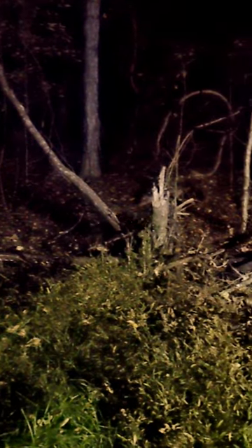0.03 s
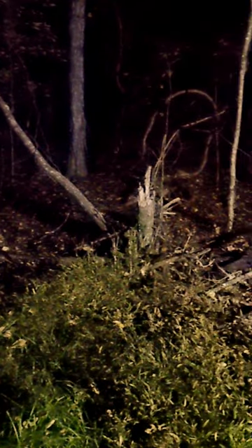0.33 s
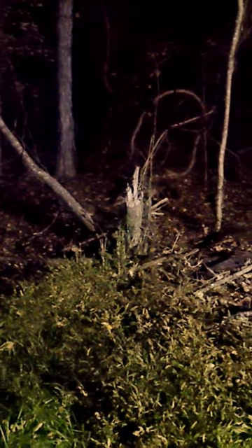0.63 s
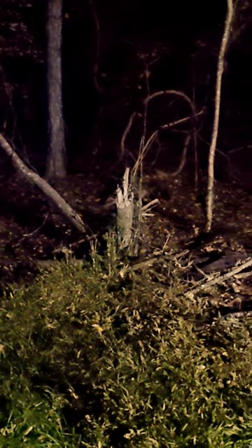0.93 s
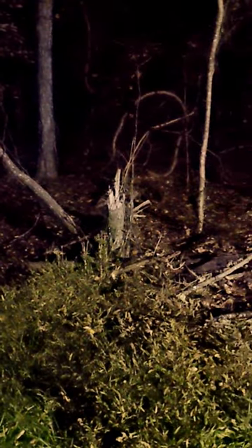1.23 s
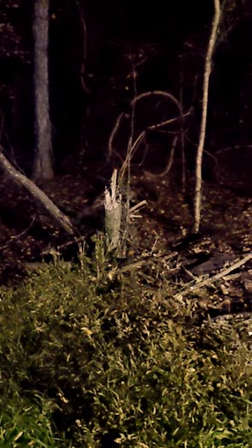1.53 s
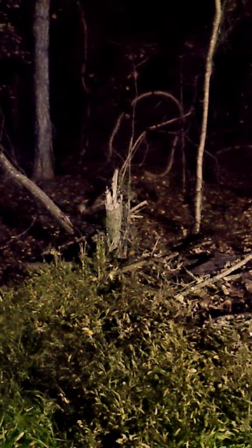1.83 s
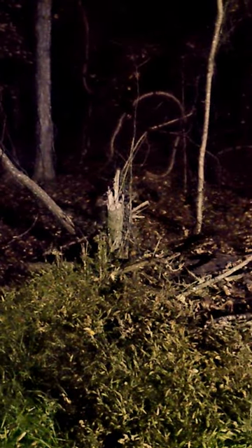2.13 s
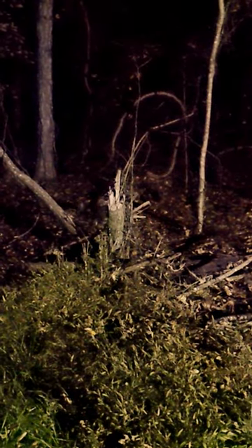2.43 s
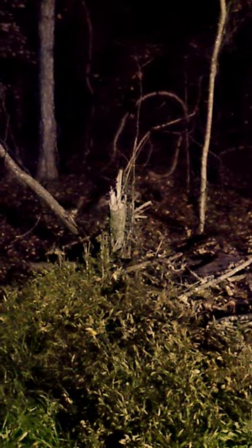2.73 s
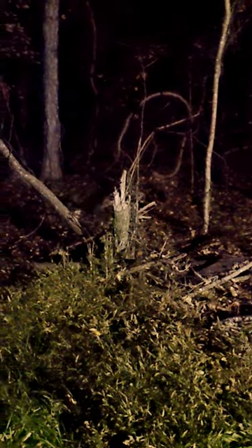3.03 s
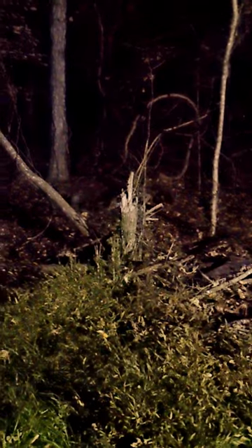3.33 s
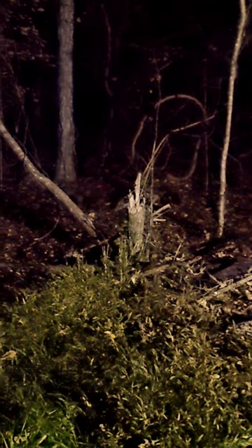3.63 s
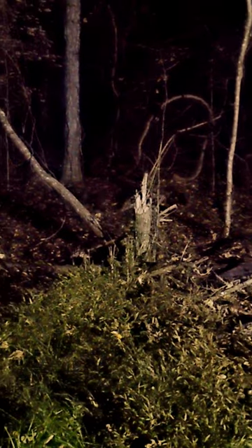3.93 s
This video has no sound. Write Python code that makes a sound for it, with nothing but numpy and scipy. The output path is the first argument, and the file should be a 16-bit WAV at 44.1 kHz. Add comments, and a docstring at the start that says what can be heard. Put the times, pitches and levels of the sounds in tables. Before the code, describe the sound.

A dense cricket chorus rings on in two pitches through dark woodland. Underneath, a far engine hums with a soft rumble of traffic, and now and then dry leaves crackle lightly near the microphone, to the left.

```python
"""Dozens of crickets trill at night at the edge of a wood, mainly in two pitch bands.
Each wing stroke rings a short falling note; the trees scatter the notes into a tail.
Dry leaves rustle faintly close by on the left, a dense crackle of tiny snaps.
A far engine drones and whines over a low rumble of traffic and night air."""
import sys
import numpy as np
from scipy import signal
from scipy.fft import rfft, irfft
from scipy.io import wavfile
from scipy.ndimage import map_coordinates

SR = 44100
rng = np.random.default_rng(int(sys.argv[2]) if len(sys.argv) > 2 else 0)


def put_to_file(sound):
    """Save the sound as 16-bit audio at rate SR, in the file named by the first command-line argument."""
    columns = np.atleast_2d(sound).T  # one column per channel
    safe = np.clip(columns, -1, 1)
    whole_steps = np.round(safe * 32767)
    wavfile.write(sys.argv[1], SR, whole_steps.astype(np.int16))


N = 176400
TIME_S = np.arange(N) / SR
FREQ_HZ = np.fft.rfftfreq(N, 1 / SR)

# near crickets: pitch_hz, spread_hz, strokes_per_s, level_db, pan_db (left minus right)
CHORUS_KINDS = [(2279, 42, 36, -52.5, 4), (2438, 60, 38, -58, -4), (4333, 55, 40, -60, 8.5),
                (4473, 32, 44, -63, -3.5)]
# far crickets: pitch_hz, spread_hz, strokes_per_s, level_db, pan_db
CROWD_KINDS = [(1965, 42, 45, -72.5, 1.5), (2361, 130, 48, -58, 1), (2583, 200, 71, -73, -2),
               (3132, 28, 45, -78.5, 1.5), (4350, 195, 58, -63, 0.5), (5067, 200, 60, -73, 1.5)]
# steady leaf stir: time_s, crisp_db
LEAF_STIR = [(0, -62), (.12, -68.5), (.3, -66), (.55, -69.5), (.8, -67.5), (1.05, -68), (1.45, -67),
             (1.65, -71), (1.77, -68), (1.85, -69), (2.1, -66), (2.26, -71.5), (2.34, -66.5), (2.55, -70.5),
             (3, -67.5), (3.2, -65), (3.6, -66.5), (3.85, -63), (4, -65)]
# leaf rustles: centre_s, length_s, crisp_db, crisp_over_papery_db
LEAF_RUSTLES = [(1.142, 0.027, -65, 5), (1.903, .035, -68, 8), (2.016, 0.031, -63, 6),
                (2.046, 0.027, -66, 3), (2.747, .06, -66.5, 5), (2.828, 0.039, -63, 3),
                (3.019, 0.014, -66, 1), (3.096, 0.076, -61, 3), (3.49, 0.12, -65, 2), (3.705, .018, -64, 2),
                (3.793, 0.049, -66, 7)]
# leaf snaps: start_s, crisp_db
LEAF_SNAPS = [(1.138, -61), (1.153, -47), (1.16, -55), (1.9, -54), (2.011, -56), (2.041, -55), (2.46, -63),
              (2.634, -59), (3.33, -53), (3.477, -52), (3.787, -60)]
# leaf treble: freq_hz, relative_db
CRISP_SPECTRUM = [(4000, -72), (7000, -13), (10500, -11), (11800, -3.5), (12300, -5), (13000, -1.5),
                  (14500, -4), (16000, -9.5)]
# leaf upper mids: freq_hz, relative_db
PAPERY_SPECTRUM = [(2000, -18), (5500, -10), (6600, -6.5), (7100, -1), (7600, -8), (8100, -6.5), (9000, -6),
                   (9550, -14.5), (10000, -7.5), (11000, -36), (14000, -11)]
# engine drone: time_s, level_db, pitch_hz
ENGINE_DRONE = [(0.0, -55.5, 83.4), (0.2, -48, 77.2), (0.28, -58, 85.5), (0.32, -47, 80.8),
                (0.41, -65, 71.2), (0.51, -50.5, 80.15), (0.68, -46, 80), (0.77, -60, 82.8),
                (0.82, -46.5, 82.6), (0.99, -49, 82.6), (1.05, -58, 81.6), (1.56, -51, 82.81),
                (1.58, -54, 82.4), (2.36, -54, 83.5), (2.38, -47, 85.2), (2.53, -60.5, 85),
                (2.56, -48.5, 83.77), (2.82, -56, 84.7), (2.94, -46, 85.2), (3.01, -62, 85.16),
                (3.2, -52.5, 86.2), (3.23, -64, 85.3), (3.33, -49, 86.03), (3.42, -58.5, 85.9),
                (3.94, -49.5, 85.47), (4.0, -48, 88.1)]
# upper engine whine: time_s, level_db, pitch_hz
UPPER_WHINE = [(0, -80, 503), (.18, -71, 503.7), (.42, -68.5, 504.4), (.6, -77, 507.4),
               (1.05, -78.5, 505.4), (1.52, -67, 510.8), (1.75, -74.5, 512.3), (3.1, -73, 514),
               (3.35, -85, 514.6), (3.52, -67.5, 516.2), (4, -65.5, 514.7)]
# lower engine whine: time_s, level_db, pitch_hz
LOWER_WHINE = [(0, -94, 335), (1.7, -79.5, 339), (2.05, -70, 340), (2.7, -74, 342), (3.1, -72.5, 343),
               (3.7, -74, 342.2), (4, -76, 345)]
# far rumble: freq_hz, relative_db
RUMBLE_SPECTRUM = [(20, -25), (32, -22), (55, -3), (75, 2.5), (110, -2), (170, -3), (240, -9), (290, -15),
                   (420, -16.5), (600, -13), (800, -14), (1000, -21.5), (1400, -21), (1600, -28),
                   (3500, -29.5), (6000, -32.5), (16000, -45.5)]
# rumble likeness between ears: freq_hz, correlation
RUMBLE_CORRELATION = [(60, 0.97), (130, 1), (260, 0.9), (650, 0.59), (1000, 0.57), (1400, -0.15),
                      (3000, 0.3), (16000, -0.84)]
# rumble balance: freq_hz, pan_db
RUMBLE_BALANCE = [(60, 2.3), (160, -1.4), (330, 3.5), (700, -0.4), (3000, 0.3), (16000, -15.5)]
# single crickets: centre_s, length_s, pitch_hz, level_db
SOLO_CALLS = [(0.14, 0.27, 4465, -61.5), (1.13, .3, 4670, -73), (.83, .07, 2325, -56),
              (.82, .04, 4290, -59), (1.2, 0.09, 2290, -52), (1.35, 0.09, 4290, -61.5),
              (1.735, .03, 4400, -59), (1.77, 0.16, 2345, -55), (2.77, 0.12, 2303, -58)]
# soft brush through leaves: freq_hz, relative_db
BRUSH_SPECTRUM = [(3000, -40), (6300, -14), (7800, -4), (9000, -6), (11000, -9), (14000, -23)]

STROKE_DUTY, STROKE_SAG, STROKE_DETUNE, STROKE_SCATTER_DB = .7, .022, .005, 2
PITCH_WANDER, TEMPO_WANDER, TEMPO_SPREAD = .006, .06, .13


def undb(db):
    """Decibels to gain."""
    return 10 ** (np.asarray(db) / 20)


def level(x, db):
    """Set the rms level."""
    return x * undb(db) / np.sqrt(np.mean(x ** 2))


def curve(rows, column=1):
    """Table column interpolated over time."""
    rows = np.array(rows)
    return np.interp(TIME_S, rows[:, 0], rows[:, column])


def across(points):
    """Table of freq_hz, value interpolated over log frequency."""
    hz, value = np.array(points).T
    return np.interp(np.log(FREQ_HZ + 1), np.log(hz), value)


def colour(x, spectrum):
    """Filter by a table of freq_hz, gain_db."""
    return irfft(rfft(x) * undb(across(spectrum)), N)


def walk(steps_per_s):
    """Random drift with a spread near 1."""
    steps = rng.standard_normal(256)
    return map_coordinates(steps, [TIME_S * steps_per_s], order=1, mode="mirror") * np.sqrt(3 / 2)


def pan(db):
    """Ear gains, left minus right in dB."""
    return level(undb(np.array([[db], [-db]]) / 2), 0)


def burst(centre_s, length_s):
    """Flat-topped swell."""
    return np.exp(-.5 * (2 * (TIME_S - centre_s) / length_s) ** 4)


def cricket(pitch_hz, strokes_per_s, scatter):
    """Each wing stroke rings one slightly falling note, varied in pitch and force."""
    strokes = rng.random() + np.cumsum(strokes_per_s * np.exp(TEMPO_WANDER * walk(20))) / SR
    detune, force = rng.standard_normal((1024, 2))[strokes.astype(int) % 1024].T
    progress = np.minimum(strokes % 1 / STROKE_DUTY, 1)
    bend = PITCH_WANDER * walk(3) + scatter * np.clip(detune, -2.3, 2.3) - STROKE_SAG * (progress - .5)
    note = np.sin(2 * np.pi * np.cumsum(pitch_hz * (1 + bend)) / SR)
    return np.sin(np.pi * progress) * note * undb(STROKE_SCATTER_DB * force)


def chirping(chirps_per_s=4.2, chirp_db=.5, drift_db=1.2):
    """Gain of a trill that pulses lightly and drifts in strength."""
    cycles = rng.random() + np.cumsum(chirps_per_s * np.exp(.3 * walk(1))) / SR
    return undb(chirp_db * np.sin(2 * np.pi * cycles) + drift_db * walk(2.98))


def wood(x, t60_s=.56, wet_db=1):
    """Trunks and foliage scatter sound into a separate tail for each ear."""
    tail = rng.standard_normal((2, SR)) * np.exp(-np.log(1000) * TIME_S[:SR] / t60_s)
    direct = x * signal.windows.tukey(N, .003)
    wet = signal.fftconvolve(direct, tail, axes=1)
    wet[:, :SR - 1] += wet[:, N:]  # wrapped: already ringing at the start
    return level(direct, 0) + np.array([level(ear, wet_db) for ear in wet[:, :N]])


def chorus(pitch_hz, spread_hz, strokes_per_s, level_db, pan_db, count=8, distance_db=1.2):
    """Crickets of one kind, each with its own pitch, tempo, distance and direction."""
    rank = (np.arange(count) + .5) / count
    offsets = np.log(rank / (1 - rank)) * np.sqrt(3) / np.pi  # logistic quantiles
    ears = np.zeros((2, N))
    for offset in offsets:
        tempo, near, side = rng.standard_normal(3)
        rate_hz = strokes_per_s * np.exp(TEMPO_SPREAD * tempo)
        song = cricket(pitch_hz + spread_hz * offset, rate_hz, STROKE_DETUNE)
        song *= chirping() * undb(distance_db * near)
        ears += np.array([song, np.roll(song, int(10 * side))])
    return level(wood(ears), level_db) * pan(pan_db)


def crowd(pitch_hz, spread_hz, strokes_per_s, level_db, pan_db, count=6):
    """Far crickets blur together: every stroke comes at another pitch."""
    rates_hz = strokes_per_s * np.exp(TEMPO_SPREAD * rng.standard_normal((2, count)))
    scatter = spread_hz / pitch_hz
    ears = np.array([sum(cricket(pitch_hz, rate_hz, scatter) for rate_hz in ear) for ear in rates_hz])
    return level(wood(ears), level_db) * pan(pan_db)


def crackle(spectrum, grains_per_s=16000, scatter_db=1.5, pan_db=8.5):
    """Dense tiny snaps of dry leaves, mostly on the left."""
    grains = (rng.random((2, N)) < grains_per_s / SR) * rng.standard_normal((2, N))
    sizes = undb(scatter_db * np.minimum(rng.exponential(size=(2, N)), 4))
    return level(colour(grains * sizes, spectrum), 0) * undb([[0], [-pan_db]])


def leaves(stir_bright_db=3, snap_decay_s=.0039):
    """Leaves stir throughout and now and then rustle or snap."""
    crisp_power = undb(curve(LEAF_STIR)) ** 2
    papery_power = crisp_power * undb(-stir_bright_db) ** 2
    for centre_s, length_s, crisp_db, bright_db in LEAF_RUSTLES:
        power = (undb(crisp_db) * burst(centre_s, length_s)) ** 2
        crisp_power += power
        papery_power += power * undb(-bright_db) ** 2
    for start_s, crisp_db in LEAF_SNAPS:
        decay = (TIME_S >= start_s) * np.exp(-abs(TIME_S - start_s) / snap_decay_s)
        crisp_power += (undb(crisp_db) * decay) ** 2
    crisp = np.sqrt(crisp_power) * crackle(CRISP_SPECTRUM)
    papery = np.sqrt(papery_power) * crackle(PAPERY_SPECTRUM)
    return crisp + papery


def tone(rows, waver_db):
    """One engine tone, wavering in level on its way through the air."""
    phase = 2 * np.pi * np.cumsum(curve(rows, column=2)) / SR
    return np.sqrt(2) * np.sin(phase) * undb(curve(rows) + waver_db * walk(12))


def engine(smear_db=-11, smear_width_hz=8.9, left_lag_s=.00012):
    """Throbbing drone, smeared by distance, under two thin whines."""
    drone = tone(ENGINE_DRONE, waver_db=1)
    centre_hz = curve(ENGINE_DRONE, column=2).mean()
    band = np.exp(-.5 * ((FREQ_HZ - centre_hz) / smear_width_hz) ** 2)
    noise = irfft(rfft(rng.standard_normal(N)) * band, N)
    smear = level(noise, smear_db) * undb(curve(ENGINE_DRONE))
    right = drone + smear + tone(UPPER_WHINE, waver_db=2) + tone(LOWER_WHINE, waver_db=2)
    left = map_coordinates(right, [np.arange(N) - left_lag_s * SR], order=1, mode="nearest")
    return np.array([left, right])


def rumble(level_db=-58, drift_db=.5):
    """Far traffic and night air, alike in both ears in the bass."""
    mid, side = colour(rng.standard_normal((2, N)), RUMBLE_SPECTRUM)
    correlation = np.clip(across(RUMBLE_CORRELATION), -.9, .999)
    mid = irfft(rfft(mid) * np.sqrt(1 + correlation), N)
    side = irfft(rfft(side) * np.sqrt(1 - correlation), N)
    ears = np.array([colour(mid + side, RUMBLE_BALANCE), mid - side])
    return level(ears, level_db) * undb(drift_db * walk(2.074))


def solos(strokes_per_s=42, pan_db=3):
    """Single nearer crickets rise briefly out of the chorus."""
    song = np.zeros(N)
    for centre_s, length_s, pitch_hz, level_db in SOLO_CALLS:
        trill = cricket(pitch_hz, strokes_per_s, STROKE_DETUNE)
        song += level(trill, level_db) * burst(centre_s, length_s)
    return level(wood(np.array([song, song])), 0) * song.std() * pan(pan_db)


def brush(centre_s=1.388, length_s=.31, left_db=-69):
    """One longer, softer, duller sweep of leaves."""
    return undb(left_db) * burst(centre_s, length_s) * crackle(BRUSH_SPECTRUM)


def scene():
    """Crickets and leaves over the far engine and rumble."""
    near = sum(chorus(*kind) for kind in CHORUS_KINDS)
    far = sum(crowd(*kind) for kind in CROWD_KINDS)
    return near + far + solos() + leaves() + brush() + engine() + rumble()


def record(dry, cutoff_hz=15730):
    """Steep low-pass on the top treble."""
    return signal.sosfilt(signal.ellip(12, .1, 70, cutoff_hz, fs=SR, output="sos"), dry)


dry = scene()
out = record(dry)
put_to_file(out)
```